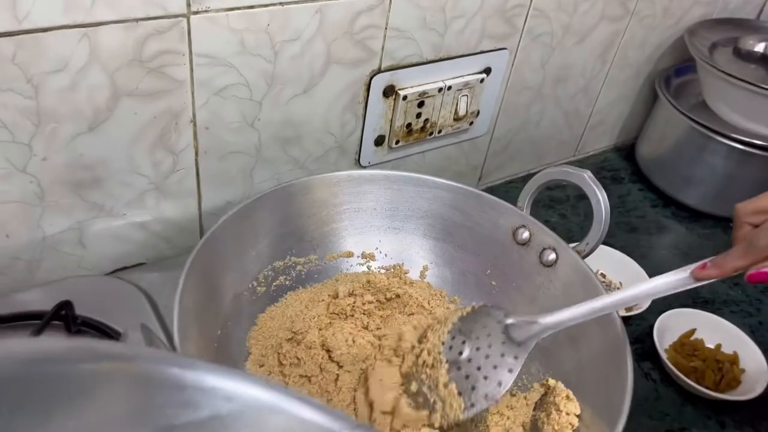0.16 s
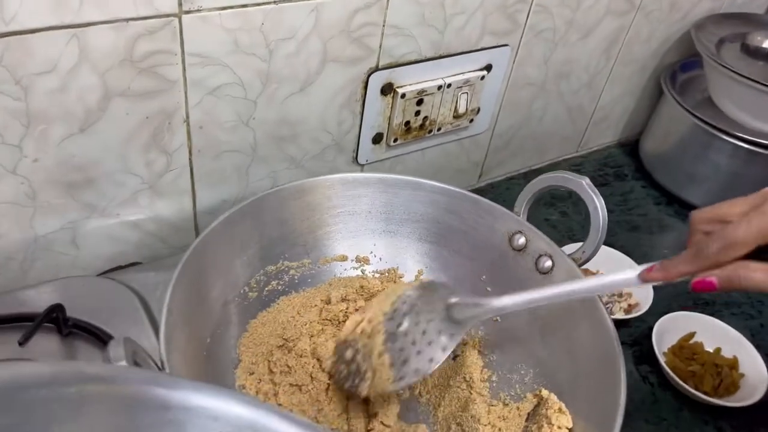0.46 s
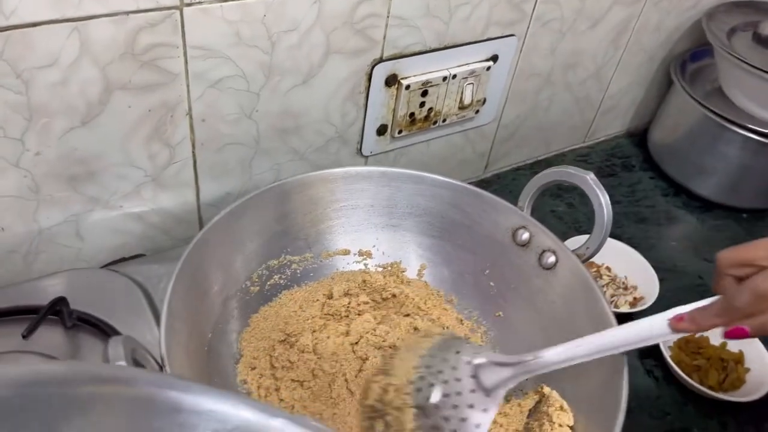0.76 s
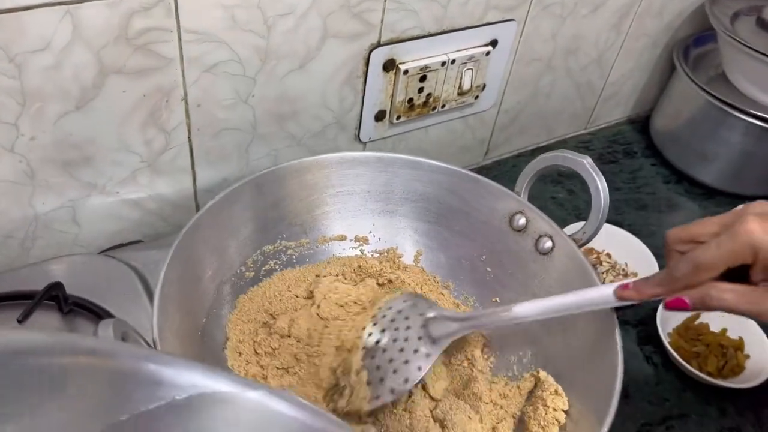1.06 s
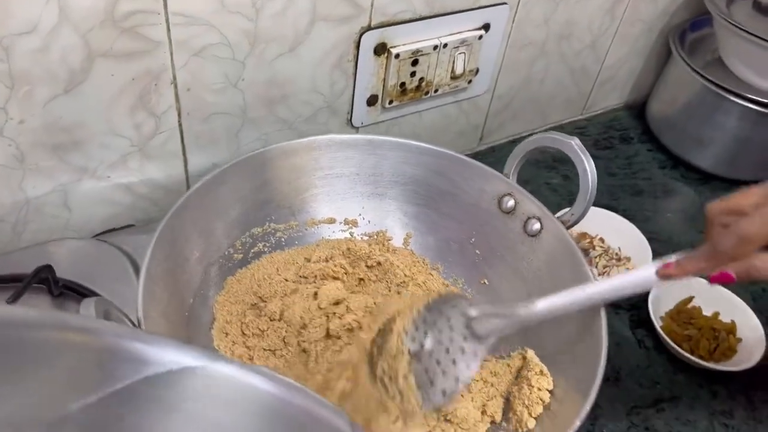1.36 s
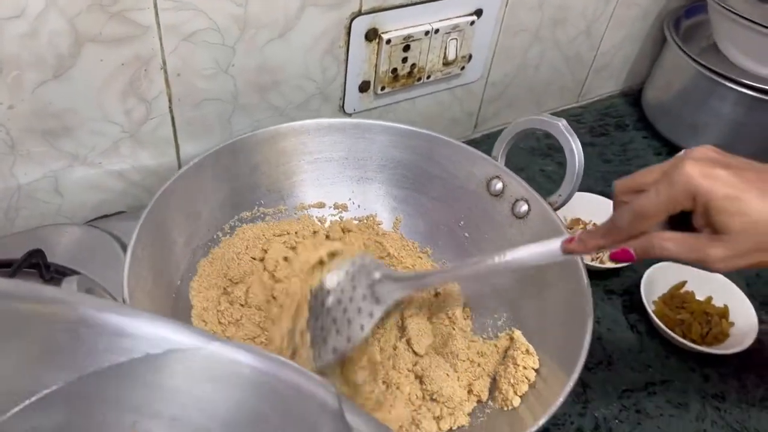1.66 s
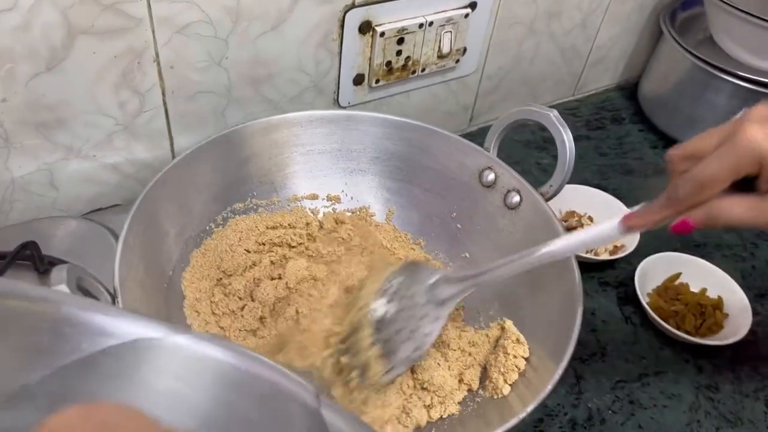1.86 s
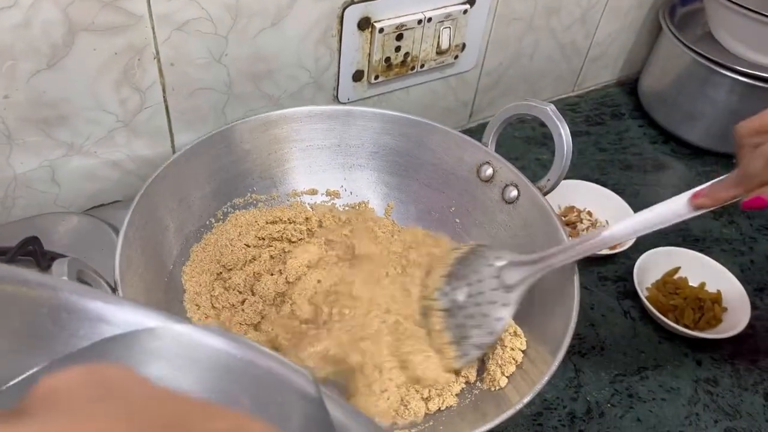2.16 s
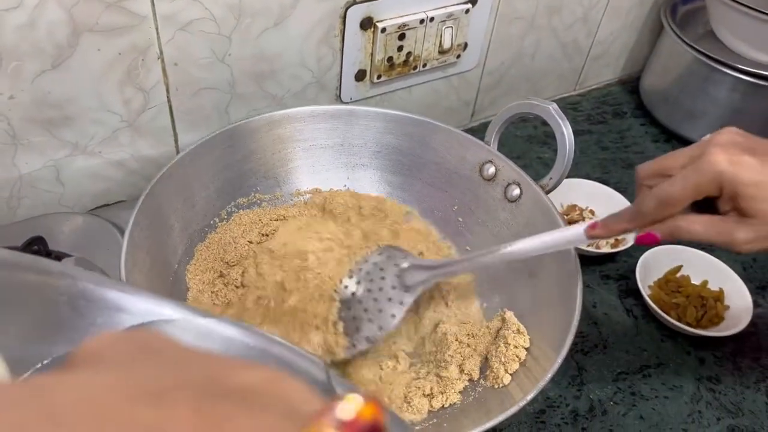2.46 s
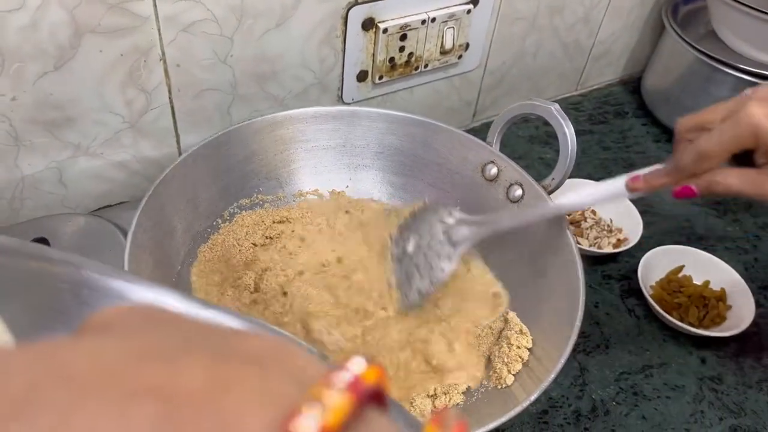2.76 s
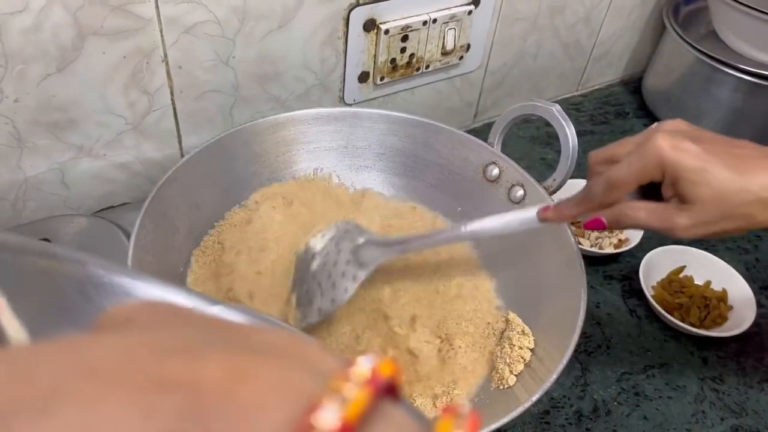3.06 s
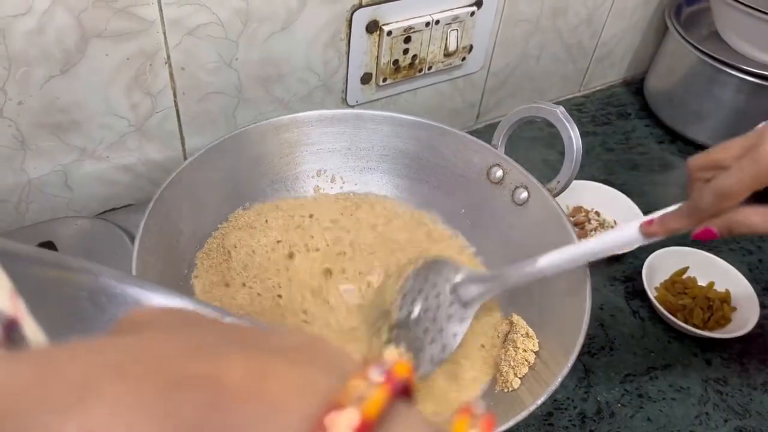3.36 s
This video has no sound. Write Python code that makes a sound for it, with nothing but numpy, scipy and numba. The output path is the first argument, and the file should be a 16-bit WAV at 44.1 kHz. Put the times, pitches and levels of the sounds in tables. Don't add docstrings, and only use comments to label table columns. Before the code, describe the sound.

Violent sizzle of water poured into a hot pan of grain, boiling then dying down

```python
import sys
import numpy as np
from scipy import signal
from scipy.fft import rfft, irfft, next_fast_len
from scipy.io import wavfile
from scipy.ndimage import uniform_filter1d
from numba import njit

SR = 44100
rng = np.random.default_rng(int(sys.argv[2]) if len(sys.argv) > 2 else 0)


def dump(signal):
    limited = np.clip(np.atleast_2d(signal).T, -1, 1)
    pcm = np.round(limited * 32767).astype(np.int16)
    wavfile.write(sys.argv[1], SR, pcm)


def boost_factor(decibels):
    exponent = np.asarray(decibels, float) / 20
    return 10 ** exponent


N = 154350
T = np.arange(N) / SR
FFT_SIZE = next_fast_len(N)
HZ = np.maximum(np.fft.rfftfreq(FFT_SIZE, 1 / SR), 1)


# time_s, steam_db, fizz_db, boil_db
POUR = [(0.17, -106, -98, -101), (0.21, -48.5, -50, -74), (0.22, -49, -52.5, -68), (0.27, -44, -44, -45),
        (0.84, -48, -49.5, -51.5), (0.93, -33.5, -47.5, -43.5), (1.01, -41, -42.5, -38),
        (1.37, -38, -42.5, -37), (1.58, -41, -43.5, -35), (1.74, -33.5, -39, -32), (1.89, -44, -46, -35),
        (2.01, -38, -41.5, -33), (2.3, -48.5, -42, -34.5), (2.53, -43, -41, -36), (2.8, -62.5, -52, -50),
        (2.99, -47, -43.5, -44.5), (3.04, -60, -45, -50.5), (3.5, -59.5, -63, -52.5)]


def pour_level(column):
    rows = np.array(POUR)
    return boost_factor(np.interp(T, rows[:, 0], rows[:, column]))


# pitch_hz, density_db (per Hz)
STEAM = [(250, -60), (700, -10.5), (1000, -31), (2200, -5.5), (3300, -7), (5500, -9.5), (8000, -22),
         (12000, -45)]


def steam_jets():
    bubbles = pops(3000, 3.4, 0.4, top_hz=12040, ring_s=0.0053)
    return boost_factor(1.5) * pour_level(1) * colour(bubbles, STEAM, slow_db=0.17, quick_db=0.8, depth=1.0)


# pitch_hz, density_db (per Hz)
FIZZ = [(1000, -31), (3000, -18.5), (5500, -7.5), (8000, -5.5), (9800, -8.5), (11000, -18.5), (14800, -20),
        (15800, -44)]


def fine_fizz():
    bubbles = pops(4000, 4.2, 0.43, top_hz=15920, ring_s=0.0043)
    return boost_factor(0.53) * pour_level(2) * colour(bubbles, FIZZ, slow_db=0.0, quick_db=1.1, depth=1.1)


# pitch_hz, density_db (per Hz)
BOIL = [(330, -49), (480, -36), (560, -15), (800, -3), (1500, -9), (2900, -3), (3500, -18), (6000, -31.5)]
PAN_HZ = [490, 600, 653, 785, 824, 941, 1035, 1185, 1351, 1478, 1593, 1722, 1780, 2052]
PAN_MODE_DB = [-12.5, -0.5, 0, 1.5, -3.5, -2.5, 1.5, 0, 0, 1, -1, -2, -2, 3.5]


def boiling_mash():
    t60_s, pan_db, patchy_db = 0.12, -11, 3.0
    boil = pour_level(3)
    mash = pops(1500, 1.96, 0.52, top_hz=7011, ring_s=0.0049)
    body = boil * colour(mash, BOIL, slow_db=-0.23, quick_db=2.1, depth=0.85)
    pan = 0
    for hz, db in zip(PAN_HZ, PAN_MODE_DB):
        push = mash * boil * boost_factor(patchy_db * walk(9.06))
        pan = pan + modes(push, [(hz, db, t60_s)])
    return boost_factor(-4.5) * body + boost_factor(pan_db) * level(pan, 0) * np.sqrt(np.mean(boil ** 2))


def pops(rate, spread_db, share, top_hz, ring_s):
    when, pitch, rarity = rng.random((int(rate * N / SR), 3)).T
    start = (when * N).astype(np.int64)
    turn = 2 * np.pi * top_hz * pitch / SR
    fade = np.full(len(start), 1 / (ring_s * SR))
    size = boost_factor(spread_db * np.minimum(-np.log(1 - rarity), 3))
    bubbles = level(grains(start, turn, fade, size, N), 0)
    bubble_power = share * top_hz / (SR / 2)
    return np.sqrt(bubble_power) * bubbles + np.sqrt(1 - bubble_power) * rng.standard_normal(N)


@njit
def grains(start, turn, fade, size, n):
    y = np.zeros(n)
    for k in range(len(start)):
        step = np.exp(1j * turn[k] - fade[k])
        rise_step = np.exp(-2 * fade[k])
        z, closed = size[k] + 0j, 1.
        for i in range(start[k], min(start[k] + int(4 / fade[k]), n)):
            z, closed = z * step, closed * rise_step
            y[i] += z.imag * (1 - closed)
    return y


# pitch_hz, width_hz, boost_db
HOLLOWS = [(850, 93, -8), (8170, 430, -2), (2120, 160, 0), (3070, 130, 3), (4335, 1060, 8.5),
           (7260, 1470, 7), (9014, 940, 7.5), (11300, 810, 5), (14000, 810, 3.5)]


def colour(x, table, slow_db, quick_db, depth):
    rows = np.array(table)
    db = np.interp(np.log(HZ), np.log(rows[:, 0]), rows[:, 1], left=-70)
    for hz, width, boost in HOLLOWS:
        db = db + depth * boost / (1 + (2 * (HZ - hz) / width) ** 2)
    spectrum = rfft(x, FFT_SIZE) * boost_factor(db)
    place = np.clip(1.5 * np.log2(HZ / 350), 0, 8)
    out, shared = 0, walk(6.4)
    for k in range(9):
        shared = (shared + walk(5.6)) / np.sqrt(2)
        band = irfft(spectrum * np.clip(1 - abs(place - k), 0, 1), FFT_SIZE)[:N]
        out = out + band * boost_factor(slow_db * shared + quick_db * walk(34.95))
    return level(out, 0)


# time_s, length_s, removed_share (0-1), pitch_hz, width_hz
DIPS = [(.3, 0.12, 0.9, 880, 230), (0.64, 0.39, 0.8, 890, 210), (0.63, 0.25, 0.5, 1650, 350),
        (.2, .06, .8, 1600, 780), (1.1, 0.47, 0.25, 1730, 220), (2.75, .5, 0.5, 8350, 520),
        (2.46, 0.34, .6, 3680, 430), (2.75, 0.24, .6, 6250, 810), (3.14, .1, 0.7, 6600, 1000),
        (2.75, .15, 0.44, 1040, 250), (3.3, 0.17, .5, 8100, 700), (0.51, .8, 0.27, 7430, 650),
        (.9, .05, .6, 1500, 800), (1.83, .25, .6, 546, 110), (3.35, 0.13, .6, 1350, 150)]


def thin_bands(x):
    for s, length, share, hz, width in DIPS:
        band = signal.lfilter(*signal.iirpeak(hz, hz / width, fs=SR), x)
        x = x - share * swell(s, length, 0) * band
    return x


# time_s, length_s, level_db, pitch_hz
RINGS = [(0.294, .07, -57.5, 650), (.57, .07, -58.5, 765), (0.966, .04, -46.5, 650), (1.31, .05, -50, 650),
         (1.388, .06, -50.5, 770), (1.5, .04, -46.5, 640), (1.6, .04, -47, 650), (1.82, 0.047, -47, 821),
         (2.018, 0.048, -43.5, 653), (2.187, 0.076, -47, 653), (2.365, 0.04, -41, 650),
         (2.436, 0.06, -46, 603), (2.529, 0.028, -47, 605), (2.578, 0.034, -44, 657),
         (2.633, 0.044, -47.5, 601), (2.689, 0.023, -44.5, 657), (2.726, 0.044, -53, 610),
         (2.79, 0.028, -42, 650), (2.83, .05, -54, 650), (2.865, 0.029, -50, 650),
         (3.028, 0.023, -42.5, 652), (3.085, 0.046, -56, 640), (3.181, 0.032, -43.5, 653),
         (3.217, 0.023, -50.5, 653), (2.63, .05, -50.5, 1720), (2.718, 0.033, -50.5, 1730),
         (2.817, .055, -51, 1750), (2.943, .05, -51, 1730), (3.025, 0.039, -57, 1570),
         (2.37, 0.066, -48, 941), (2.6, .06, -52.5, 941), (2.99, .06, -58, 941), (2.61, .05, -48, 2075),
         (1.28, .09, -69, 183), (1.25, 0.071, -48.5, 1185), (0.497, .04, -55, 1030), (3.14, .06, -59, 790),
         (2.82, .25, -57, 1738)]


def rings():
    waver = 0.67 * walk(45)
    flutter = 0.22 * (walk(110) + 1j * walk(110))
    keep = np.exp(-1 / (0.01 * SR))
    out = 0
    for k, (s, length, db, hz) in enumerate(RINGS):
        envelope = signal.lfilter([1 - keep], [1, -keep], swell(s, length, db))
        tone = (1 + np.roll(flutter, k * SR // 7)) * np.exp(1j * (2 * np.pi * hz * T + waver))
        out = out + np.sqrt(2) * envelope * tone.imag
    return out


# time_s, length_s, level_db, pitch_hz
BURSTS = [(.491, 0.0037, -41, 2140), (.31, .004, -45, 4300), (.875, .006, -44, 5900),
          (1.5, .006, -40, 2520), (2.903, .006, -48, 7310), (3.02, 0.034, -47, 5400), (2.6, .06, -50, 4800),
          (2.24, .15, -44, 1700), (1.58, 0.14, -44, 2000), (2.92, 0.036, -47, 7100)]


def bursts():
    return pockets(BURSTS, cycles=4.5)


# time_s, length_s, level_db, pitch_hz
SCRAPES = [(.5, 0.034, -53, 1270), (0.98, 0.036, -48, 1160), (1.656, 0.11, -41, 1567),
           (2.98, 0.12, -54, 1690), (0.46, 0.16, -56, 1054), (2.93, 0.044, -51.5, 5000),
           (2.6, 0.023, -49, 2930), (2.92, 0.046, -47, 3040), (2.985, 0.049, -46, 2880),
           (3.12, 0.095, -54, 2920), (2.68, 0.054, -44, 2860), (1.316, 0.66, -47, 1167),
           (2.467, 0.28, -46.5, 1690), (2.405, 0.25, -42.5, 2960), (1.002, 0.13, -42, 2060),
           (0.695, 0.11, -58.5, 1300), (3.18, 0.39, -64, 490), (2.62, .12, -61, 470), (2.65, .35, -55, 646),
           (0.543, 0.079, -55.5, 1000), (3.11, 0.19, -56, 8900), (2.5, 0.49, -48, 7380),
           (3.06, 0.36, -50.5, 7270), (2.39, 0.25, -50, 8950), (3.12, 0.25, -54, 9200),
           (2.78, 0.24, -55.5, 1725)]


def scrapes():
    return pockets(SCRAPES, cycles=22.0)


# time_s, length_s, level_db, pitch_hz
GLUGS = [(1.28, 0.033, -48.5, 476), (1.27, 0.022, -59, 370), (1.8, 0.038, -53, 475), (2.05, .05, -54, 487),
         (2.25, .06, -61.5, 485), (2.42, 0.1, -58, 348), (2.81, 0.098, -57, 339), (2.97, 0.15, -60.5, 338),
         (3.13, 0.067, -56, 320), (3.21, 0.059, -55, 417), (3.2, 0.1, -60.5, 288), (3.47, 0.064, -58, 310)]


def glugs():
    return pockets(GLUGS, cycles=7.8)


def pockets(table, cycles):
    noise = rng.standard_normal(N)
    out = 0
    for s, length, db, hz in table:
        resonance = [(hz, 0, cycles / hz)]
        ring = modes(modes(noise, resonance), resonance)
        out = out + swell(s, length, db) * level(ring, 0)
    return out


def drip():
    start_s, level_db, t60_s = 0.035, -62, 0.17
    fade = boost_factor(level_db - 60 * np.maximum(T - start_s, 0) / t60_s)
    lowpass = signal.butter(4, 9500, fs=SR, output="sos")
    metal_noise, hiss_noise = signal.sosfilt(lowpass, rng.standard_normal((2, N)))
    metal = modes(metal_noise, [(2640, -7, .012), (2300, -10, .015), (1900, -14, .02),
                                (600, -6, .03), (1750, -12, .03), (380, -6, .03)])
    hiss = modes(hiss_noise, [(4500, -10.0, .0012), (8200, -17, 0.0022)])
    return fade * (metal + hiss)


# time_s, length_s, level_db, pitch_hz
KNOCKS = [(1.155, .018, -62, 40), (1.652, .018, -63, 40), (1.898, .02, -66, 40), (2.712, .016, -60, 42)]


def knocks():
    out = 0
    for s, length, db, hz in KNOCKS:
        phase = 2 * np.pi * hz * (T - s)
        out = out + swell(s, length, db) * (np.cos(phase) + 0.58 * np.cos(2.15 * phase))
    return out


# pitch_hz, density_db (per Hz)
ROOM = [(15, -3), (30, -5), (70, -23), (130, -18), (270, -27.5), (600, -26), (2000, -46), (10000, -58)]
# pitch_hz, level_db (rms)
HUM = [(102.3, -80), (150.7, -84.5), (183.0, -77.5)]


def kitchen():
    rows = np.array(ROOM)
    db = np.interp(np.log(HZ), np.log(rows[:, 0]), rows[:, 1])
    air = irfft(rfft(rng.standard_normal(FFT_SIZE)) * boost_factor(db), FFT_SIZE)[:N]
    room = level(air, -65)
    for hz, hum_db in HUM:
        room = room + np.sqrt(2) * boost_factor(hum_db + 1.4 * walk(2.76)) * np.sin(2 * np.pi * hz * T)
    rise = boost_factor(5.5 * (T / T[-1] - .5))
    duck = 1 - 0.57 * swell(0.16, 0.084, 0)
    return room * rise * duck


def level(x, db):
    return x * boost_factor(db) / np.sqrt(np.mean(x ** 2))


def walk(rate):
    k = int(SR / rate)
    held = np.repeat(rng.standard_normal(N // k + 1), k)
    return level(uniform_filter1d(uniform_filter1d(held, k), k)[:N], 0)


def swell(s, length, db):
    return boost_factor(db) * np.maximum(1 - ((T - s) / length) ** 2, 0) ** 2


def modes(x, table):
    out = 0
    for hz, db, t60 in table:
        r, w = 1000 ** (-1 / (t60 * SR)), 2 * np.pi * hz / SR
        ring = signal.lfilter([1, 0, -1], [1, -2 * r * np.cos(w), r * r], x)
        out = out + boost_factor(db) * np.sqrt(1 - r) * ring
    return out


def scene():
    sizzle = thin_bands(steam_jets() + fine_fizz() + boiling_mash())
    pan = sizzle + bursts() + scrapes() + glugs() + drip()
    pan = signal.sosfilt(signal.butter(4, 282, "high", fs=SR, output="sos"), pan)
    mono = pan + rings() + knocks() + kitchen()
    return np.array([mono, mono])


def band_limit(x):
    return signal.sosfilt(signal.butter(12, 15690, fs=SR, output="sos"), x)


# time_s, low_hz, high_hz
FLECKS = [(.72, 7600, 9000), (.72, 11700, 13100), (.766, 9700, 11000), (.766, 13800, 15600),
          (.975, 7600, 9000), (1.742, 8300, 9700), (2.624, 5600, 6900)]


def record(dry):
    other = np.roll(dry[0], 700)
    side = 0
    for s, low, high in FLECKS:
        window = np.cos(np.pi * np.clip((T - s) / .046, -.5, .5))
        band = signal.butter(4, [low, high], "band", fs=SR, output="sos")
        side = side + boost_factor(-3) * window * signal.sosfilt(band, other)
    mix = dry + side * np.array([[1], [-1]])
    return band_limit(mix)


dry = scene()
out = record(dry)
dump(out)
```